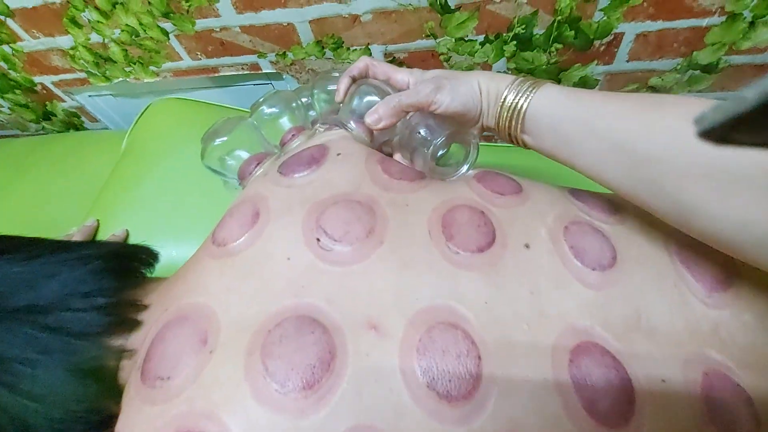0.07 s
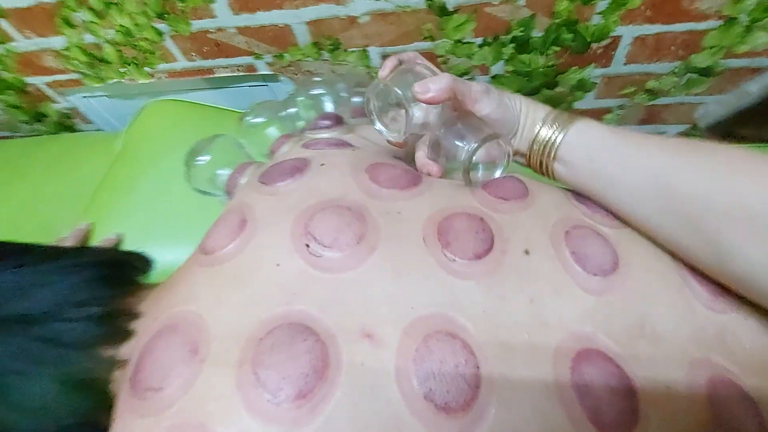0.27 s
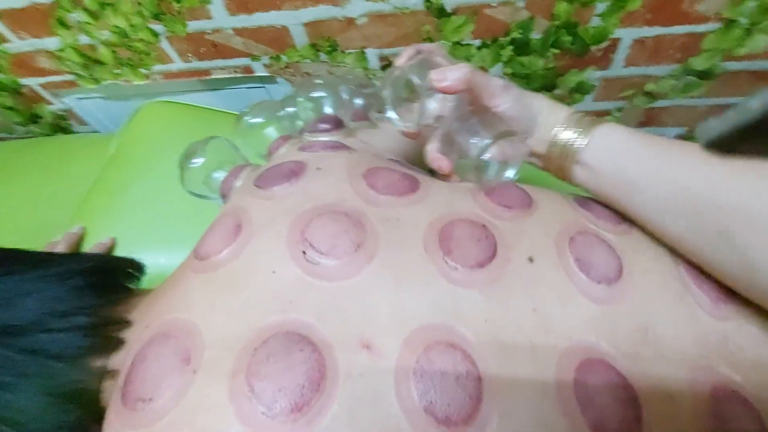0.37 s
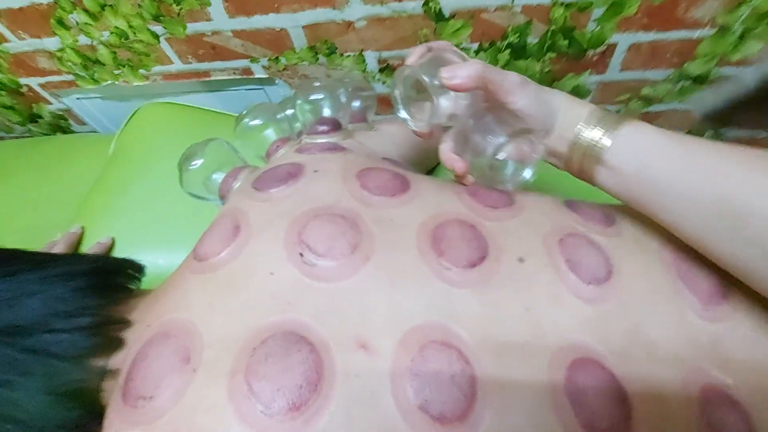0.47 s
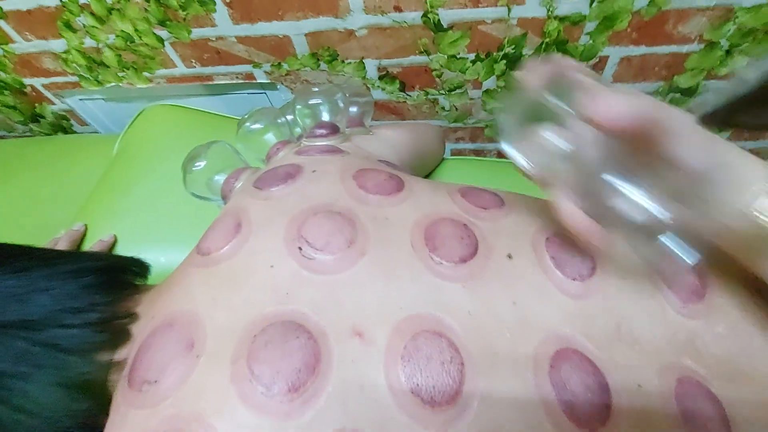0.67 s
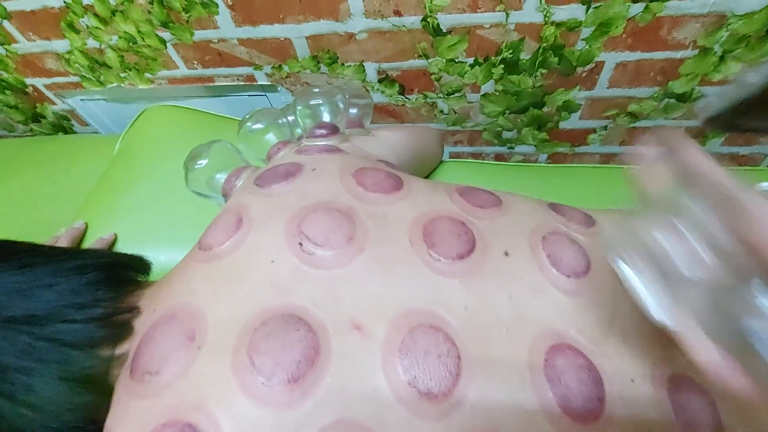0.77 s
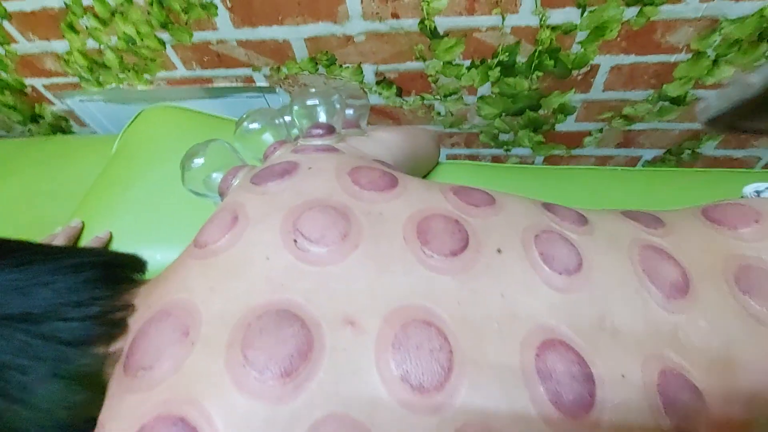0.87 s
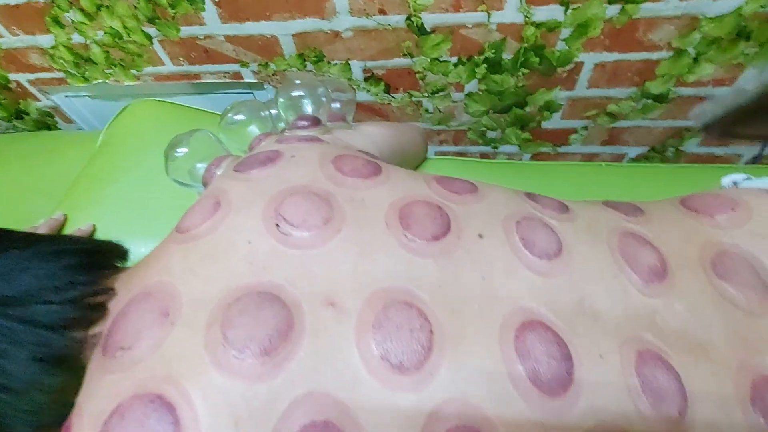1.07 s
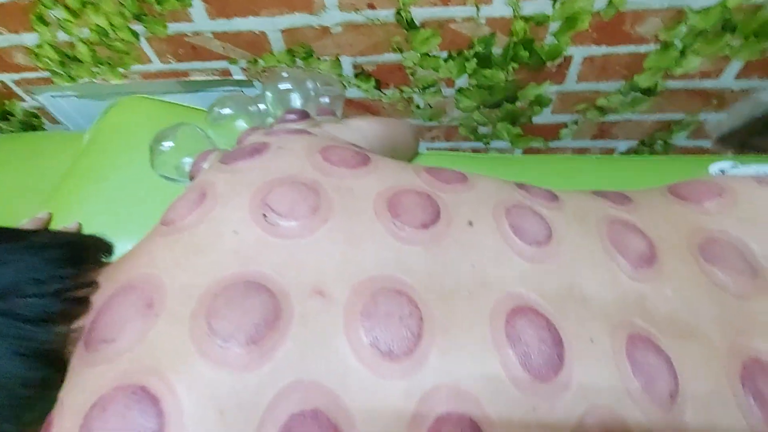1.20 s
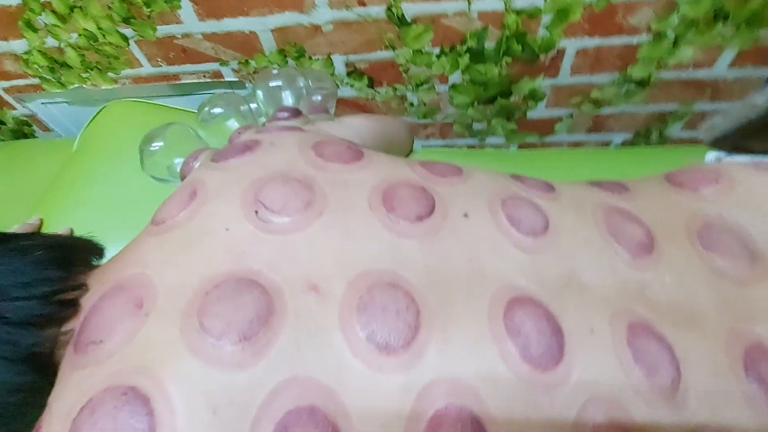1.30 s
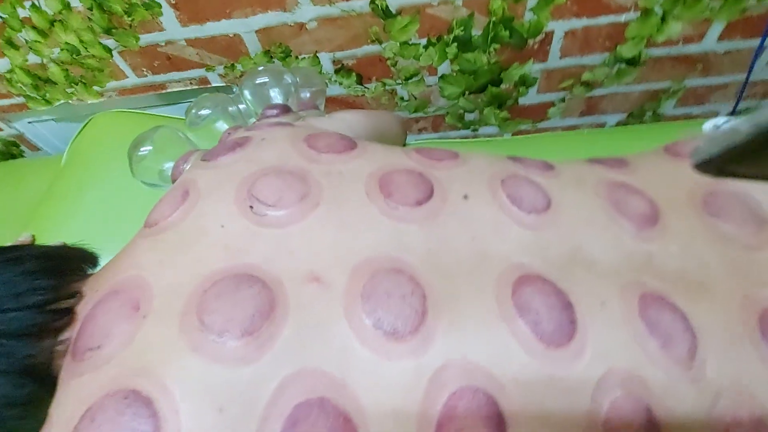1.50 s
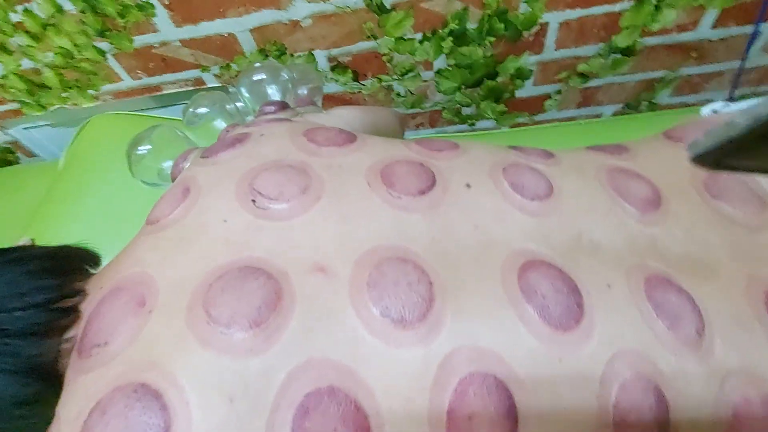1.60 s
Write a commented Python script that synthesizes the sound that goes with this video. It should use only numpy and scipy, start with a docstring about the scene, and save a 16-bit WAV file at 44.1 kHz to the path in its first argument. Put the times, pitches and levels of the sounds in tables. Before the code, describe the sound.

Close to the microphone in a small room, a suction cup of glass releases from skin with a quick hiss and a sharp pop. A short clatter of glass on glass follows, over a faint fan hum.

```python
"""Cupping glass pulled off skin

A small room, a stereo pair of microphones close by. Air hisses in under the rim, the seal breaks with
a thump, and the air in the cup rings, rising in pitch as the mouth clears the skin. The cup then knocks
against others held in the same hand. Behind it a fan hums, and the arm brushes faintly as it moves."""
import sys
import numpy as np
from scipy import signal
from scipy.fft import rfft, irfft
from scipy.io import wavfile
from scipy.ndimage import uniform_filter1d

SR = 44100
rng = np.random.default_rng(int(sys.argv[2]) if len(sys.argv) > 2 else 0)


def generate_wav(signal):
    """Clip the signal to [-1, 1] and save it as 16-bit WAV at the path in sys.argv[1]."""
    frames = np.transpose(np.atleast_2d(signal))
    scaled = np.clip(frames, -1, 1) * 32767
    pcm = np.round(scaled).astype(np.int16)
    wavfile.write(sys.argv[1], SR, pcm)


N = 72765
T = np.arange(N) / SR
BIN_HZ = np.fft.rfftfreq(N, 1 / SR)
RELEASE_S = .233  # the seal breaks


def undb(db):
    """Decibels to gain."""
    return 10 ** (np.asarray(db) / 20)


def on_log(hz, points):
    """Read a (freq_hz, value) table on a log-frequency axis."""
    freqs, values = np.array(points, float).T
    return np.interp(np.log(np.maximum(hz, 1)), np.log(freqs), values)


def tint(x, colour):
    """Filter by a (freq_hz, gain_db) table."""
    return irfft(rfft(x) * undb(on_log(BIN_HZ, colour)), N)


def noise(colour):
    """Coloured noise of rms 1."""
    x = tint(rng.standard_normal(N), colour)
    return x / x.std()


def drift(rate_hz):
    """Slow random drift, spread near 1."""
    hold = int(SR / rate_hz)
    steps = np.repeat(rng.standard_normal(N // hold + 1), hold)
    return 1.5 * uniform_filter1d(uniform_filter1d(steps, hold), hold)[:N]


def since(start_s):
    """Seconds since a moment, 0 before it."""
    return np.maximum(T - start_s, 0)


def ring(hz, t60, start_s=0):
    """One decaying mode."""
    age = since(start_s)
    return np.sin(2 * np.pi * hz * age) * np.exp(-np.log(1000) * age / t60)


def strike(start_s, modes):
    """Modes set ringing at one moment."""
    return sum(undb(db) * ring(hz, t60, start_s) for hz, db, t60 in modes)


def bursts(events, decay_s):
    """A sudden, decaying burst of noise at each event."""
    envelope = sum(undb(db) * (T > start) * np.exp(-since(start) / decay_s) for start, db in events)
    return envelope * rng.standard_normal(N)


def convolve(x, response):
    """Pass a sound through a response, per channel."""
    return signal.fftconvolve(np.atleast_2d(x), np.atleast_2d(response), axes=1)[:, :N]


def pan(x, left_db, lag_s=0.0001116):
    """Set the left-right balance; the hand is to the left, so the right microphone hears it late."""
    late = irfft(rfft(x) * np.exp(-2j * np.pi * BIN_HZ * lag_s), N)
    return np.array([x, late]) * undb(np.array([[left_db], [-left_db]]) / 2)


# Side against mid for diffuse sound at the pair: freq_hz, gain_db
DIFFUSE_SIDE = [(50, -17), (300, -8), (700, -1.5), (2000, 1), (15000, -0.5)]
def spread(x):
    """Opposed left and right signals, weak in the bass, which is alike at both microphones."""
    side = tint(x, DIFFUSE_SIDE)
    return np.array([side, -side])


# Decay of the small room: freq_hz, t60_s
ROOM_DECAY = [(100, 0.35), (700, 0.4), (2500, 0.32), (8000, 0.31), (14000, 0.34)]
# Low resonances between its walls: pitch_hz, level_db, t60_s
ROOM_MODES = [(60, -57, .2), (99.8, -66.5, .4), (185.8, -49.5, 0.26), (224, -54, 0.29)]
def room(delay_s=0.0027, build_s=0.0025):
    """Stereo response: reflections build up and die away octave by octave, over the low modes."""
    diffuse = spread(rng.standard_normal(N)) + rng.standard_normal(N)
    spectra = rfft(diffuse)
    octave = np.log2(np.clip(BIN_HZ, 125, 16000) / 125)
    age, tail = since(delay_s), 0
    for k in range(8):
        band = irfft(spectra * np.maximum(1 - abs(octave - k), 0), N)
        t60 = on_log(125 * 2 ** k, ROOM_DECAY)
        tail += band * np.exp(-np.log(1000) * age / t60)
    tail *= 1 - np.exp(-age / build_s)
    return tail / np.sqrt(np.sum(tail ** 2) / 2) + strike(delay_s, ROOM_MODES)


# Steady fan tones, centred in the background: pitch_hz, level_db
FAN_TONES = [(91.5, -65), (129, -67), (183, -68), (453, -72.5)]
# Two more tones that swell and fade: time_s, level_db
UPPER_SWELL = [(0, -69), (.12, -59), (.45, -54), (.6, -55), (.69, -68), (.81, -59), (.94, -57), (1.06, -67),
               (1.14, -58), (1.23, -73), (1.35, -62), (1.42, -64.5), (1.52, -60.5), (1.65, -61)]
LOWER_SWELL = [(0, -72), (.12, -55), (.5, -70.5), (.82, -71), (.94, -60), (1.05, -68), (1.19, -53.5),
               (1.29, -60.5), (1.39, -74), (1.65, -64.5)]
# Room air all around the microphones: freq_hz, gain_db
RUSH_COLOUR = [(30, -14), (62, -0.5), (110, -4), (210, -15), (330, -8.5), (430, -15), (560, -21),
               (900, -23.5), (1300, -28.5), (3000, -31), (8000, -36.5), (11500, -35.5), (15500, -48.5)]
def fan(waver_db=2.5, wander_hz=2, rush_db=-53):
    """A fan hums in wavering tones over a low rush of air."""
    upper_db = np.interp(T, *np.array(UPPER_SWELL).T)
    lower_db = np.interp(T, *np.array(LOWER_SWELL).T)
    hum = 0
    for hz, db in [*FAN_TONES, (363.6, upper_db), (274.6, lower_db)]:
        rms = undb(db + waver_db * drift(rate_hz=6.9))
        pitch_hz = hz + wander_hz * drift(rate_hz=16.41)
        hum += rms * np.sqrt(2) * np.sin(2 * np.pi * np.cumsum(pitch_hz) / SR)
    rush = spread(noise(RUSH_COLOUR)) + noise(RUSH_COLOUR)
    return hum + undb(rush_db) * rush


# Arm movements, faint and wide across the pair: centre_s, width_s, level_db
BRUSHES = [(.12, 0.07, -59.5), (1.22, 0.041, -58.5), (1.39, 0.033, -59.5), (1.62, 0.11, -62.5)]
# Their hiss: freq_hz, gain_db
BRUSH_COLOUR = [(500, -12), (2000, -11), (7000, -13.5), (12500, -5.5), (15500, -15)]
def arm_brushes():
    """The moving arm rubs in soft swells of hiss."""
    swell = sum(undb(db) * np.exp(-.5 * ((T - centre) / width) ** 2) for centre, width, db in BRUSHES)
    return swell * np.array([noise(BRUSH_COLOUR), noise(BRUSH_COLOUR)])


# Cups meeting in the hand, close on the left: start_s, gain_db
KNOCKS = [(0.3985, -11.5), (0.4177, -16.5), (0.4277, -19.5), (.4343, -25)]
# Crack of each contact: freq_hz, gain_db
KNOCK_COLOUR = [(200, -34), (600, -19), (1000, 2.5), (2500, 9), (3500, 10), (5500, -9), (7600, -23),
                (10000, -21), (12500, -18), (15500, -33)]
# Ring of the gripped glass: pitch_hz, gain_db, t60_s
GLASS_MODES = [(1380, -20, 0.012), (1935, -24, 0.027), (2660, -20, 0.017), (3276, -20.5, 0.01),
               (4470, -30, 0.01), (7560, -36.5, 0.033)]
def glass_knocks(click_db=1.5, grit_db=-12.5, rebound_s=0.00135, rebound_db=-7.5):
    """Glass clicks on glass with a little grit and touches again; the fingers choke its ring."""
    clicks = ringing = 0
    for start, db in KNOCKS:
        contact = np.sinc((T - start) * SR)
        rebound = undb(rebound_db) * np.sinc((T - start - rebound_s) * SR)
        clicks += undb(db) * (contact + rebound)
        ringing += undb(db) * strike(start, GLASS_MODES)
    grit = bursts(KNOCKS, decay_s=0.0014)
    return tint(undb(click_db) * clicks + undb(grit_db) * grit, KNOCK_COLOUR) + ringing


# Slips of the rim, close and left of centre: start_s, gain_db
SLIPS = [(0.1813, -22.5), (0.1833, -32)]
# Their thin tick: freq_hz, gain_db
SLIP_COLOUR = [(1000, -21), (6000, -8.5), (9000, -8), (11500, 6), (14000, -8)]
def rim_slips():
    """The rim ticks as it slips on the skin."""
    return tint(bursts(SLIPS, decay_s=.0005), SLIP_COLOUR)


# Air drawn in under the rim: time_s, gain_db
RIM_FLOW = [(0.189, -58), (0.204, -48.5), (0.221, -28), (0.2266, -16), (0.229, -17.5), (.235, -25),
            (0.243, -35), (.255, -70)]
def airflow():
    """Strength of the stream, peaking just before the seal breaks."""
    times, db = np.array(RIM_FLOW).T
    return undb(np.interp(T, times, db)) * (T > times[0]) * (T < times[-1])


# Hiss at the rim, close and left of centre: freq_hz, gain_db
JET_COLOUR = [(150, -20.5), (700, -16.5), (1100, -43), (1600, -29), (2100, -19.5), (3300, -29.5),
              (6000, -16), (8000, -18.5), (10200, -14), (11400, -2.5), (13300, -4.5), (15500, -8.5)]
def rim_jet(flow, gain_db=4):
    """A jet of air hisses through the gap, as loud as its flow is strong."""
    return undb(gain_db) * noise(JET_COLOUR) * flow


# Air column of the cup, from the same spot: pitch_hz, gain_db, t60_s
COLUMN_MODES = [(1347, -9.5, 0.045), (5040, -6, 0.025), (6295, -15.5, 0.019), (8850, -2, 0.017),
                (11450, 1, .008), (13310, 5, .01)]
def cup_whistle(flow, gain_db=-7):
    """The jet blows the resonances of the nearly sealed cup."""
    column = sum(undb(db) * ring(hz, t60) / np.linalg.norm(ring(hz, t60)) for hz, db, t60 in COLUMN_MODES)
    return undb(gain_db) * convolve(flow * rng.standard_normal(N), column)[0]


def skin_thump(pitch_hz=124, gain_db=-10, decay_s=0.0043):
    """The skin springs back: one heavily damped swing."""
    age = since(RELEASE_S)
    return -undb(gain_db) * (age > 0) * np.cos(2 * np.pi * pitch_hz * age) * np.exp(-age / decay_s)


# Upper modes of the open cup, close and left of centre: pitch_hz, level_db, t60_s
OPEN_CUP_MODES = [(4130, -24.5, 0.032), (6570, -20, 0.017), (9110, -16.5, 0.017)]
def cup_overtones(lead_s=0.0011):
    """The breaking seal strikes the cup's overtones just ahead of the pop."""
    return strike(RELEASE_S - lead_s, OPEN_CUP_MODES)


# First echoes off surfaces near the cup: delay_s, gain_db
NEAR_ECHOES = [(.0037, -11), (.0089, -10)]
def cup_pop(shut_hz=392, open_hz=1066, opening_s=0.01323, gain_db=-5.5):
    """The air in the cup rings, glides up as the gap widens, radiates away and echoes back."""
    attack_s, hold_s, decay_s, sag_db_per_s = 0.0023, 0.016, 0.0062, 456.5
    age = since(RELEASE_S)
    pitch_hz = open_hz + (shut_hz - open_hz) * np.exp(-age / opening_s)
    phase = 2 * np.pi * np.cumsum(pitch_hz * (age > 0)) / SR
    attack = 1 - np.exp(-age / attack_s)
    fade = undb(-sag_db_per_s * age) * np.exp(-since(RELEASE_S + hold_s) / decay_s)
    note = -undb(gain_db) * attack * fade * np.sin(phase)
    return note + sum(undb(db) * np.interp(T - delay, T, note, left=0) for delay, db in NEAR_ECHOES)


# Colour of the pop and of the knocks coming back off the walls: freq_hz, gain_db
POP_REFLECTED = [(300, 3.5), (480, -6), (600, 1), (770, 2.5), (900, -7), (1100, -2)]
KNOCK_REFLECTED = [(500, -14), (1300, -5), (1900, 0), (2500, 1), (3400, -10), (5000, -3.5), (12000, 5)]
def scene():
    """Cup and skin reach the pair directly and by way of the room, over the fan and the arm."""
    flow = airflow()
    leak = rim_jet(flow) + rim_slips() + cup_whistle(flow)
    knocks, thump, overtones, pop = glass_knocks(), skin_thump(), cup_overtones(), cup_pop()
    direct = (pan(knocks, left_db=7.5) + pan(leak + overtones, left_db=4.5)
              + pan(thump, left_db=0) + pan(pop, left_db=-3))
    to_room = (undb(-4.5) * tint(knocks, KNOCK_REFLECTED)
               + undb(-18) * leak + undb(-8) * thump + undb(-7.5) * overtones
               + undb(-12) * tint(pop, POP_REFLECTED))
    return direct + convolve(to_room, room()) + fan() + arm_brushes()


def record(dry, low_hz=46, top_hz=15750):
    """The microphones drop the deep bass and cut the top."""
    x = signal.sosfilt(signal.butter(4, low_hz, "high", fs=SR, output="sos"), dry)
    return signal.sosfilt(signal.ellip(10, .2, 80, top_hz, fs=SR, output="sos"), x)


dry = scene()
out = record(dry)
generate_wav(out)
```